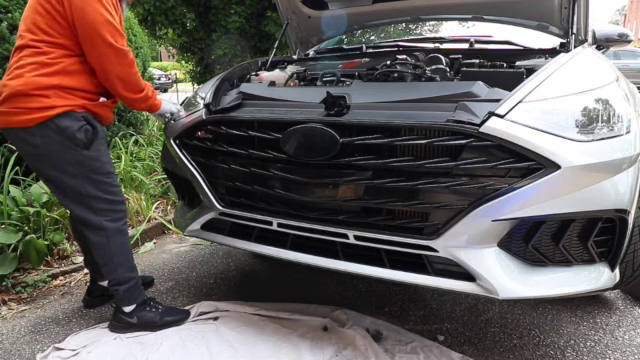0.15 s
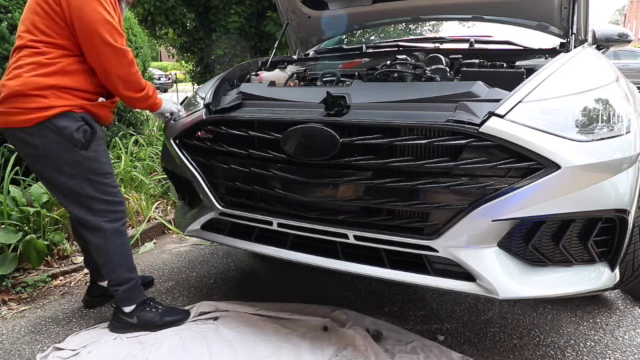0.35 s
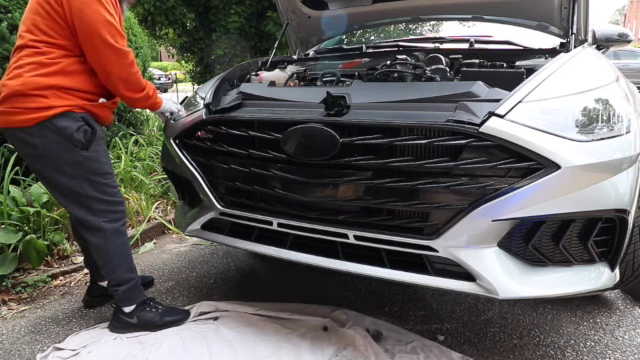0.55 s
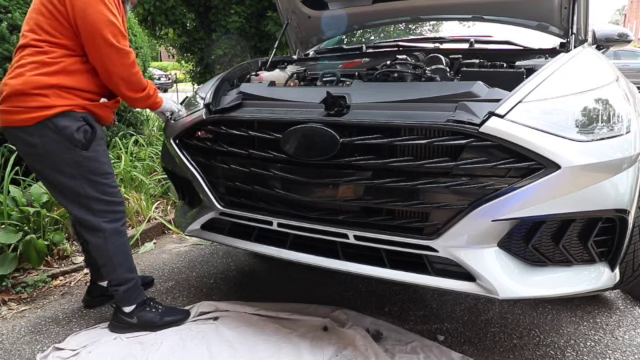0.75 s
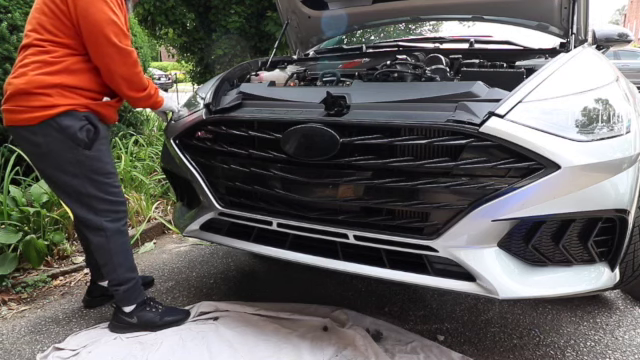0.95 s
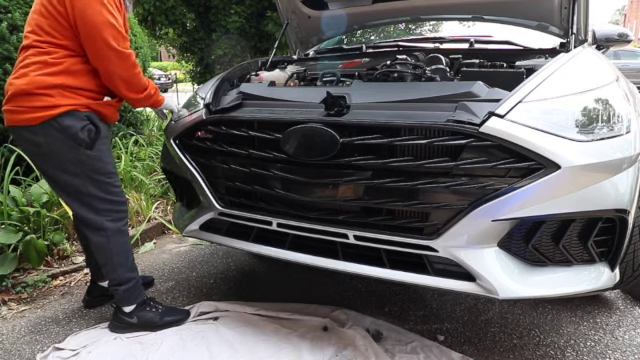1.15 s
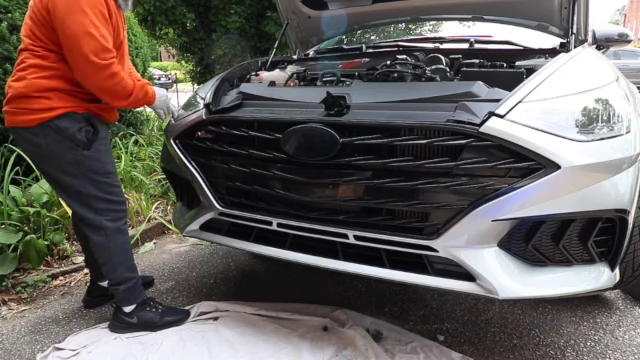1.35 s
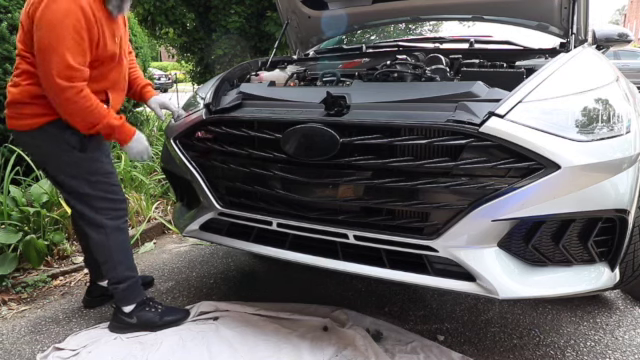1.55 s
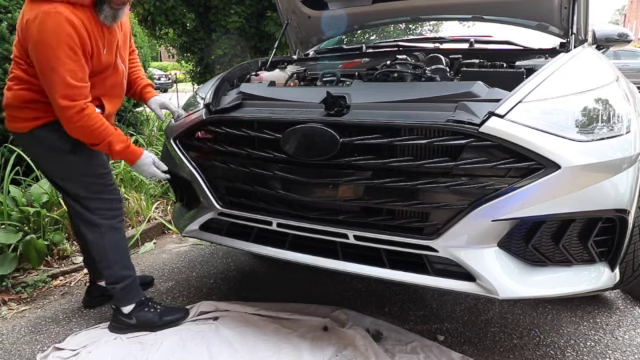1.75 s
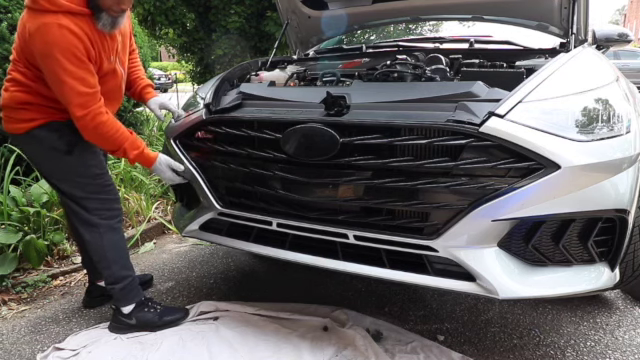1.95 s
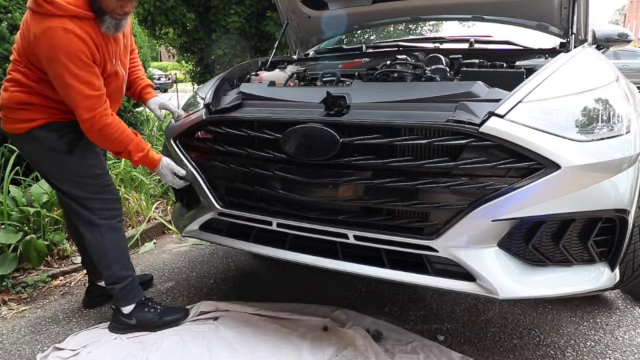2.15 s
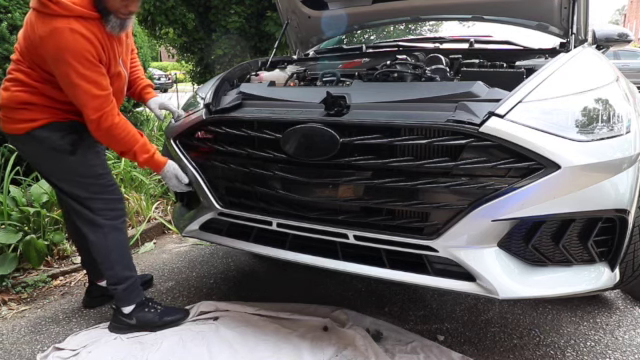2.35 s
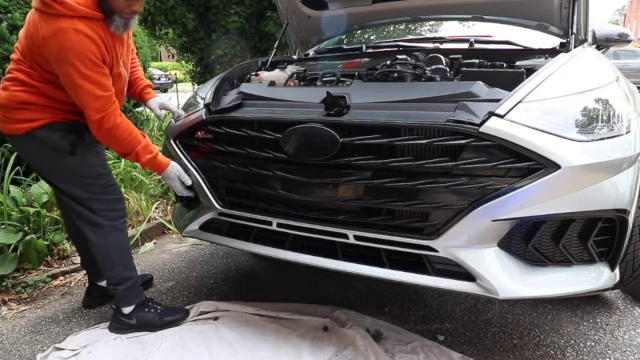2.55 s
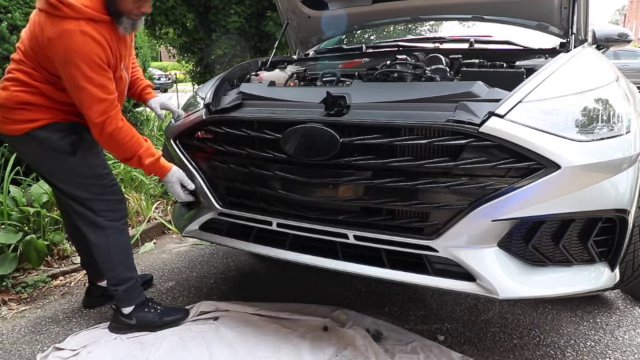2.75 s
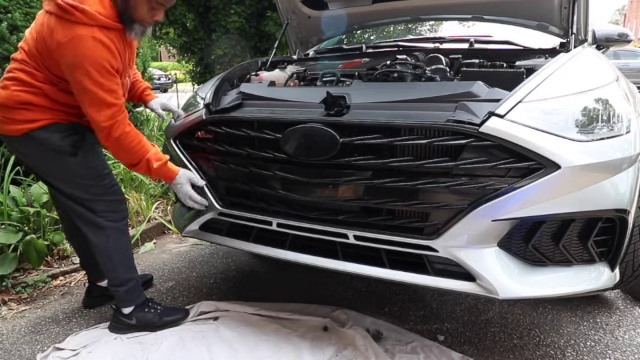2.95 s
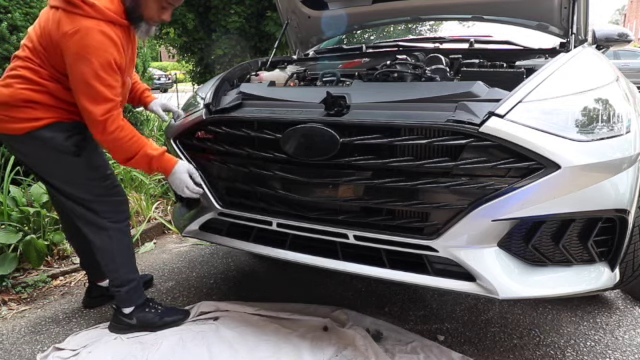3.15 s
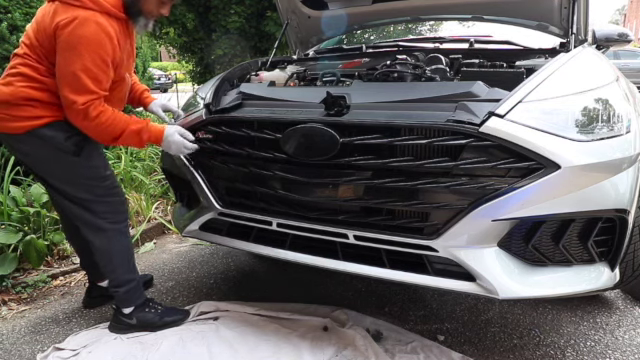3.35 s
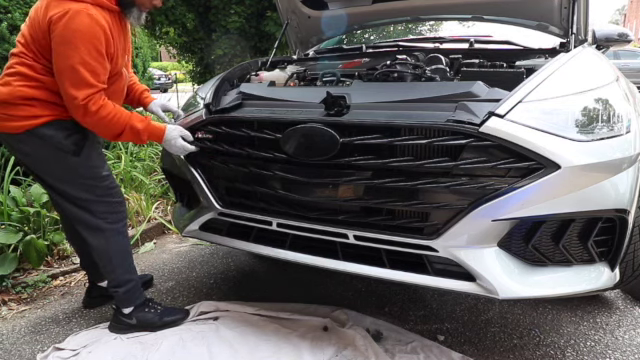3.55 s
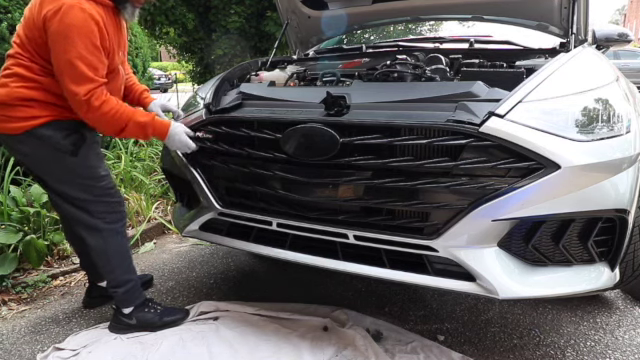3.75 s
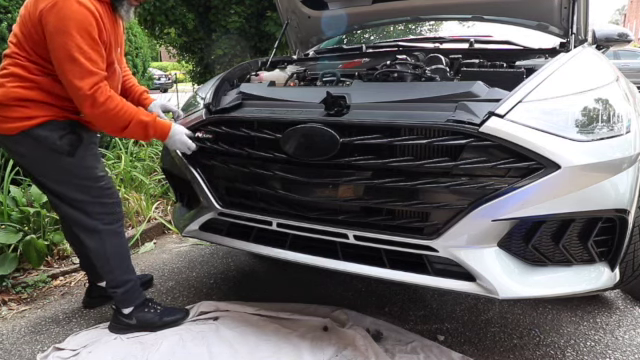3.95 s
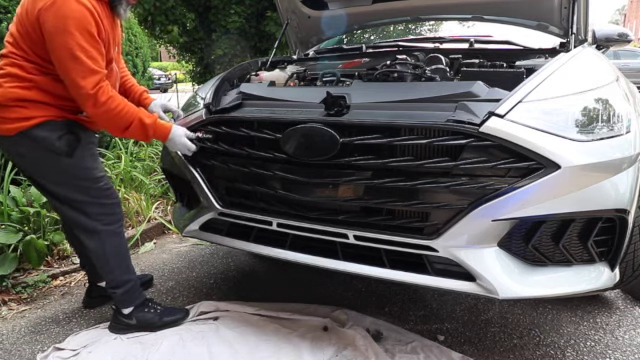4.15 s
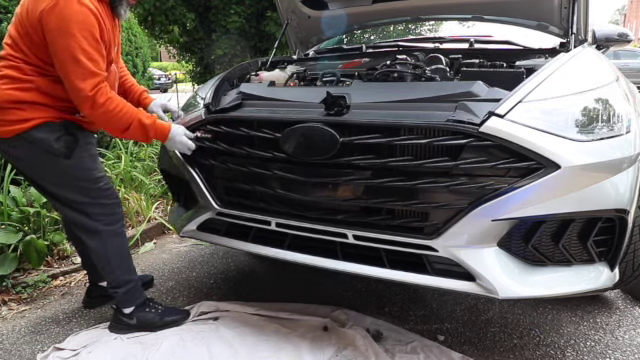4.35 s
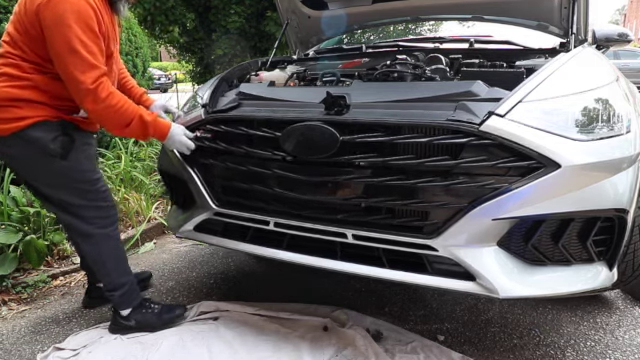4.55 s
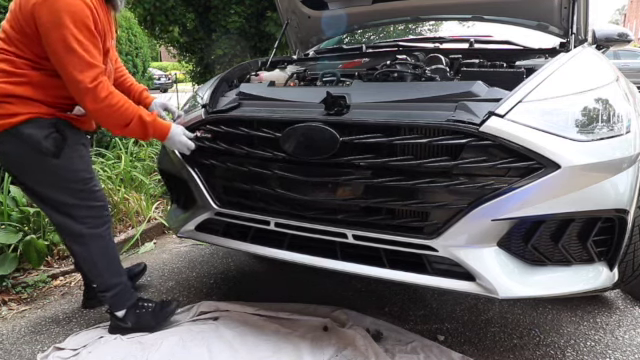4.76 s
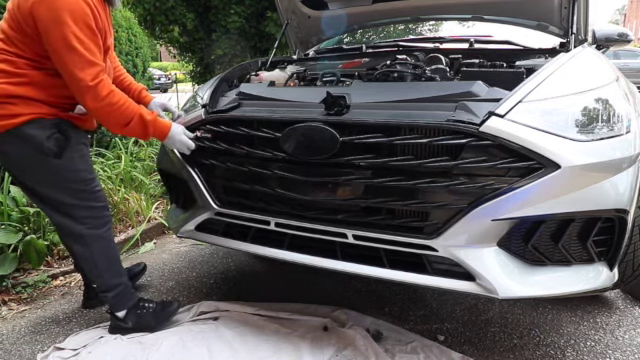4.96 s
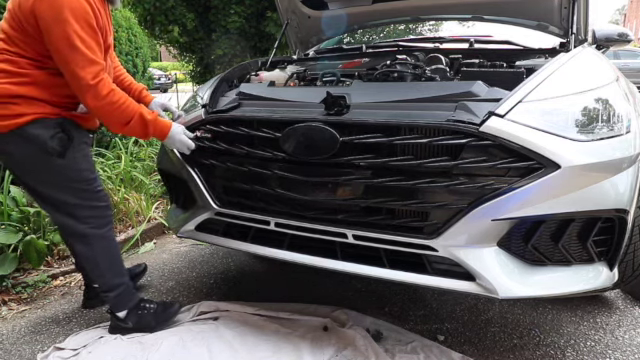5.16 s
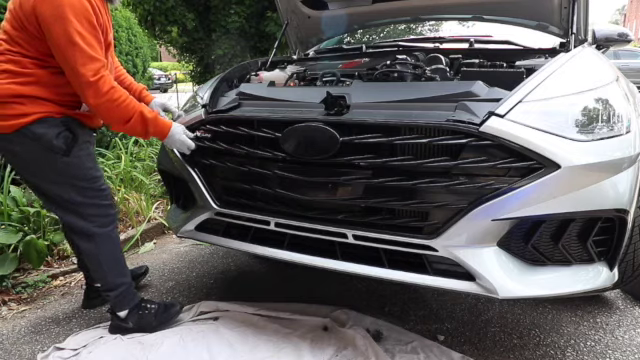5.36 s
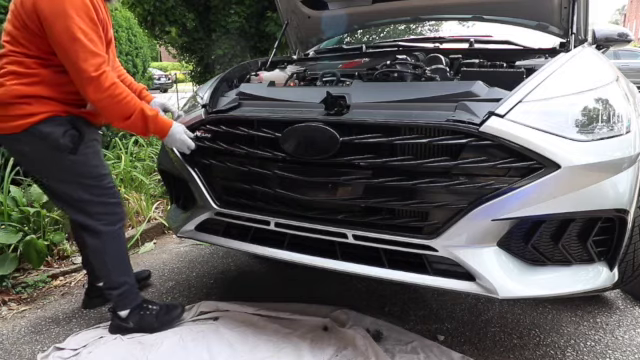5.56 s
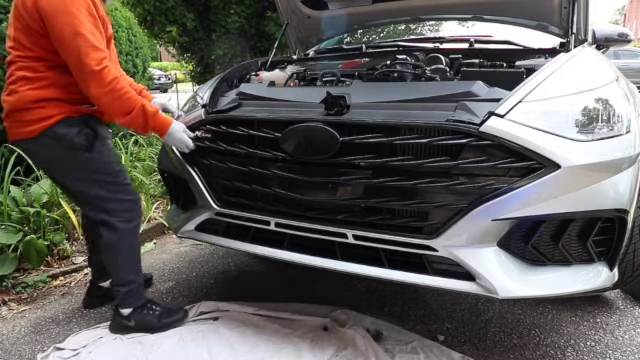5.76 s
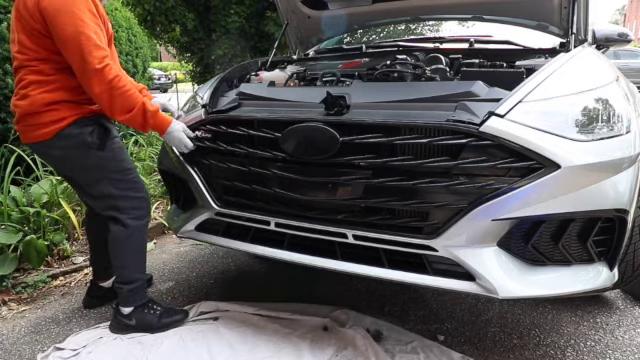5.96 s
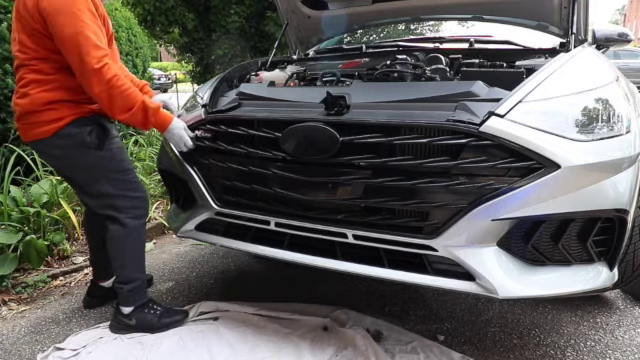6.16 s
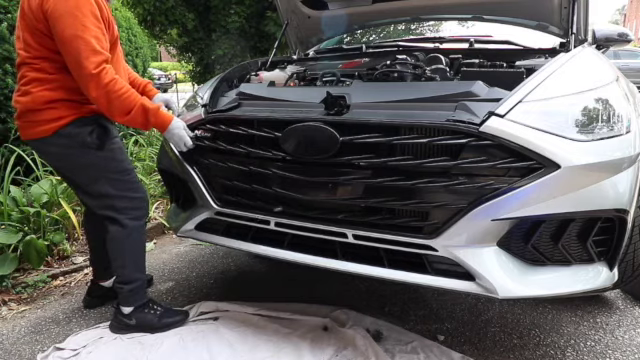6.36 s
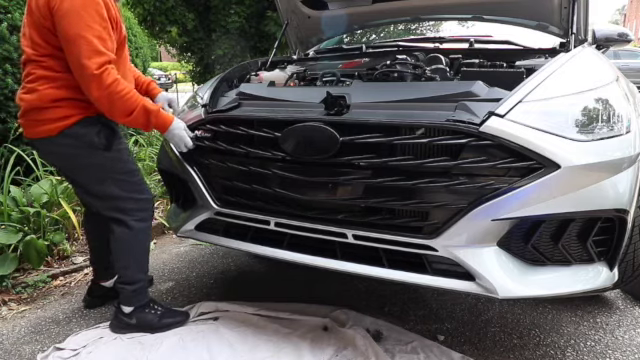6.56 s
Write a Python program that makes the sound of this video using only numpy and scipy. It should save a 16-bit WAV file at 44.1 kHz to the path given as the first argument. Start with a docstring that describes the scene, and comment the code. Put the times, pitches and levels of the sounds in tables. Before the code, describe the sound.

Very quiet beginning with dry creaky rubs, faint taps and a muffled thump over birdsong and distant road noise. A far engine hums briefly. Low flexing thuds accompany the pulling, then a brief ragged squeak and a crisp, bright double crack of clips letting go, with the loose cover knocking hollowly. It settles within half a second. Open air, slight reflections, fairly close microphone.

```python
"""At the open door of a garage, gloved hands pull a plastic bumper cover off a car.
Gripping and tapping give dry rubs (random slips) and light blows; tugs make the panel heave (low noise).
A tab squeaks by stick-slip, the clips snap free and the loose cover knocks: blows ring its modes.
Behind it are small birds (gliding sines), a high insect-like hiss and distant traffic (coloured noise)."""
import sys
import numpy as np
from scipy import signal
from scipy.fft import rfft, irfft, next_fast_len
from scipy.io import wavfile
from scipy.ndimage import uniform_filter1d

SR = 44100
rng = np.random.default_rng(int(sys.argv[2]) if len(sys.argv) > 2 else 0)


def inscribe(sig):
    """Save sig as 16-bit PCM at rate SR to the path in sys.argv[1].

    A 1-D sig is mono; a 2-D sig holds one channel per row.
    Samples are clipped to [-1, 1] before scaling.
    """
    pcm = np.round(np.clip(np.atleast_2d(sig).T, -1, 1) * 32767)
    wavfile.write(sys.argv[1], SR, pcm.astype(np.int16))


N = 291983
TIME = np.arange(N) / SR  # s
TOP_HZ = 15800  # upper limit of the audible band here


def undb(db):
    """Level to amplitude: 20 dB is a factor of ten."""
    return 10 ** (np.asarray(db) / 20)


def unit(x):
    """Normalisation to an rms value of 1."""
    return x / np.sqrt(np.mean(x ** 2))


def add(out, s, x):
    """Superposition: x is summed into out from time s on, cut at both ends of out."""
    i = int(s * SR)
    x = x[max(-i, 0):]
    i = max(i, 0)
    out[i:i + len(x)] += x[:max(N - i, 0)]


def colour(x, points):
    """Spectral weighting by (f/Hz, level/dB) points, interpolated along log frequency."""
    hz, db = np.transpose(points)
    size = next_fast_len(len(x))
    f = np.maximum(np.fft.rfftfreq(size, 1 / SR), 1)
    gain = undb(np.interp(np.log(f), np.log(hz), db))
    return irfft(rfft(x, size) * gain, size)[:len(x)]


def butter(x, hz, kind, order=2):
    """Causal Butterworth low-, high- or band-pass: a maximally flat passband."""
    edges = np.clip(hz, 5, .47 * SR)
    return signal.sosfilt(signal.butter(order, edges, kind, fs=SR, output="sos"), x)


def resonate(x, hz, width):
    """A single damped resonance of the given bandwidth in Hz, gain 1 at its centre."""
    return signal.lfilter(*signal.iirpeak(hz, hz / width, fs=SR), x)


def walk(rate):
    """Smoothed random fluctuation of rms 1: a fresh value rate times a second."""
    k = max(int(SR / rate), 1)
    steps = np.repeat(rng.standard_normal(N // k + 1), k)
    return unit(uniform_filter1d(steps, k)[:N])


def swell(s, hold, attack, release):
    """Exponential growth up to time s, a hold, exponential decay; attack and release are time constants."""
    growth = np.minimum(TIME - s, 0) / attack
    decay = np.maximum(TIME - s - hold, 0) / release
    return np.exp(growth - decay)


def echo(x, t60, wet_db):
    """Diffuse reverberation from walls and ground: exponentially decaying noise, 60 dB down after t60."""
    t = TIME[:SR // 2]
    tail = rng.standard_normal(len(t)) * undb(-60 * t / t60)
    tail /= np.linalg.norm(tail)
    return x + undb(wet_db) * signal.fftconvolve(x, tail)[:N]


def traffic(air_db=-69.1):
    """Broadband noise of distant traffic and leaves; passing cars swell a resonant tyre band."""
    # spectral density of distant traffic and leaves: f/Hz, level/dB per Hz
    outdoor_spectrum = [(20, -5), (60, 1.5), (190, -0.5), (330, -5), (620, -8), (960, -1.5), (1300, -10),
                        (2000, -14), (3100, -18), (4800, -22), (6000, -21.5), (7200, -30), (10000, -31.5),
                        (15000, -33)]
    # far cars going by: nearest at t/s, half-length/s, tyre level/dB
    passes = [(.8, .5, -77), (3.6, .6, -77), (5.95, .24, -73.5)]
    air = unit(colour(rng.standard_normal(N), outdoor_spectrum)) * undb(air_db + .5 * walk(3.3))
    power = sum(undb(db) ** 2 * np.exp(-((TIME - s) / length) ** 2 / 2) for s, length, db in passes)
    tyre_band = resonate(resonate(rng.standard_normal(N), 980, 180), 980, 180)
    return air + unit(tyre_band) * np.sqrt(power)


def shrill_hiss(shrill_db=-84.5):
    """Narrow-band noise: a band-pass gives a high insect-like hiss with slight level fluctuation."""
    band = butter(rng.standard_normal(N), [5500, 6150], "bandpass", order=3)
    return unit(band) * undb(shrill_db + .8 * walk(12))


def engine(engine_db=-73.5, octave_db=-10):
    """Two harmonics, frequency-modulated: a far engine speeds up, then slowly sags."""
    start_s, hold_s, fade_s = 2.25, .95, .18
    top_s, top_hz = 2.5, 164  # moment and frequency of the highest pitch
    rise_hz_per_s, sag_hz_per_s = 22, 10
    hz = top_hz - np.maximum(rise_hz_per_s * (top_s - TIME), sag_hz_per_s * (TIME - top_s))
    phase = 2 * np.pi * np.cumsum(hz * (1 + .008 * walk(22))) / SR
    load = swell(start_s, hold_s, fade_s, fade_s)
    harmonics = np.sin(phase) + undb(octave_db) * np.sin(2 * phase)
    return unit(harmonics * 1.0) * load * undb(engine_db + 1.5 * walk(9.8))


def birds(waver=0.012):
    """Frequency glides: three motifs of warbling sine notes recur, blurred by trees and walls."""
    # motifs, note by note: start t/s, length/s, from f/Hz, to f/Hz, level/dB, warble share
    bird_motifs = {"fall": [(-.01, .06, 4480, 3750, -3, .03), (.03, .055, 3700, 3300, -.5, .02),
                   (.07, .07, 3150, 2680, 1, .02)], "whistle": [(-.008, .06, 5100, 4820, -1.5, .04),
                   (.06, .06, 3550, 4300, -3, .08)], "chatter": [(0, .04, 4867, 4500, -1.5, .13),
                   (.03, .05, 3900, 3500, -.5, .08), (.075, .05, 4400, 3400, -3.5, .1),
                   (.13, .05, 3400, 4200, -3, .09), (.18, .036, 4300, 3600, -5, .08)]}
    # calls: t/s, motif, level/dB
    calls = [(.345, "fall", -75), (.99, "chatter", -70), (1.232, "fall", -72.5), (2.021, "whistle", -72),
             (2.36, "fall", -73), (2.53, "chatter", -72), (3.01, "whistle", -72), (3.23, "fall", -73),
             (3.75, "chatter", -70), (4.195, "whistle", -75), (4.945, "fall", -75), (5.15, "whistle", -75),
             (5.505, "chatter", -69), (5.61, "fall", -74), (6.012, "whistle", -73), (6.275, "chatter", -71),
             (6.495, "fall", -74)]
    out, tremble = np.zeros(N), walk(900)
    for s, motif, db in calls:
        for start, length, from_hz, to_hz, note_db, warble in bird_motifs[motif]:
            u = np.linspace(0, 1, int(length * SR))
            i = rng.integers(N // 2)
            glide = from_hz + (to_hz - from_hz) * u
            hz = glide * (1 + waver * rng.standard_normal() + warble * tremble[i:i + len(u)])
            note = np.sin(np.pi * u) ** 2 * np.sin(2 * np.pi * np.cumsum(hz) / SR)
            add(out, s + start, undb(db + note_db) * note)
    return echo(out, t60=.3, wet_db=2)


def flex():
    """Low-frequency radiation of a large panel: the cover heaves as it is tugged."""
    # spectral density of the heaving panel: f/Hz, level/dB per Hz
    heave_spectrum = [(10, -15), (22, -0.5), (35, 2), (60, -9), (100, -15.5), (180, -30.5), (400, -61),
                      (3000, -110)]
    # tugs: t/s, hold/s, level/dB
    tugs = [(3.15, .075, -48.5), (3.33, .02, -62), (3.725, .035, -56), (3.93, .025, -54),
            (4.265, .08, -59.5), (5.04, .04, -69.5), (6.56, .05, -64)]
    attack_s, release_s = .026, .03
    effort = sum(undb(db) * swell(s, hold, attack_s, release_s) for s, hold, db in tugs)
    return unit(colour(rng.standard_normal(N), heave_spectrum)) * effort


def rubs(slips_per_s=1000, scatter_db=4, edge_s=.006):
    """Dry friction as random tiny slips: a hiss from the glove, a creak where they ring a plastic edge."""
    # rubs: t/s, length/s, level/dB, share of creak in the power (0-1)
    rub_events = [(0.103, 0.03, -74, 0.4), (0.404, 0.022, -70.5, 0.75), (0.495, 0.025, -71, 0.6),
                  (0.64, 0.012, -67, 0.9), (0.705, 0.051, -61, 0.95), (0.784, 0.041, -71, .8),
                  (1.338, 0.023, -74, .2), (2.218, .03, -77, 0), (2.942, 0.096, -75.5, 0),
                  (3.38, 0.052, -74.5, 0.47), (3.434, .06, -73.5, 0.3), (3.78, 0.13, -77, .2),
                  (4.087, 0.047, -68, 0), (4.308, 0.055, -67, 0.4)]
    # resonances of a creaking plastic edge: f/Hz, bandwidth/Hz, level/dB
    edge_resonances = [(1790, 110, -4), (2005, 110, 4), (2870, 560, -6.5), (3350, 140, -3.5),
                       (3640, 130, -1), (4507, 73, -10), (5500, 300, -11)]
    # spectral density of the glove's hiss: f/Hz, level/dB per Hz
    glove_spectrum = [(900, -13), (2500, 0), (5500, 1.5), (8000, -8), (11000, -9.5), (15000, -8.5)]
    occurs = rng.random(N) < slips_per_s / SR
    slips = occurs * undb(scatter_db * rng.standard_normal(N)) * rng.choice([-1, 1], N)
    creak = unit(sum(undb(db) * resonate(slips, hz, width) for hz, width, db in edge_resonances))
    hiss = unit(colour(unit(slips) + rng.standard_normal(N), glove_spectrum))
    out = np.zeros(N)
    for s, length, db, share in rub_events:
        share = np.clip(share, 0, 1)
        grip = np.clip(np.minimum(TIME - s, s + length + edge_s - TIME) / edge_s, 0, 1)
        out += undb(db) * grip * (np.sqrt(share) * creak + np.sqrt(1 - share) * hiss)
    return echo(out, t60=.16, wet_db=-8)


def squeak(jitter=0.2, grit_db=-1, wobble=.04, patchy_db=2.5, count=9):
    """Stick-slip of the tab in its slot: slower and more ragged as the load builds before the snap."""
    # spectral weighting by the tab: f/Hz, level/dB
    tab_spectrum = [(400, -7), (850, -0.5), (1400, -8.5), (2000, -2), (2500, 2), (3200, -2), (4400, -1.5),
                    (5500, -13.5), (8000, -20), (14000, -25.5)]
    start_s, hold_s, level_db = .0 + 4.294, .042, -55  # full level from start_s
    attack_s, release_s = .012, .016
    slip_hz, fastest_hz = 1240, 2500  # mean rate at start_s, upper bound of the mean rate
    slowing = .0128  # share of a second by which the slip period grows per second
    smooth_roughness, ragged_after_s = .2, .048  # roughness (0-1) at first, time scale of its growth
    age = TIME - start_s
    hz = 1 / np.maximum(1 / slip_hz + slowing * age, 1 / fastest_hz)
    rough = np.minimum(smooth_roughness + (np.maximum(age, 0) / ragged_after_s) ** 2, 1)
    unsteady_hz = hz * (1 + wobble * walk(130) + jitter * rough * walk(1200))
    phase = 2 * np.pi * np.cumsum(unsteady_hz) / SR
    # harmonics of the slip rate, kept below the upper limit
    slips = sum(np.cos(k * phase) * (k * hz < TOP_HZ) / np.sqrt(k) for k in range(1, count + 1))
    # noise that peaks once a slip
    grit = undb(grit_db) * rough * (1 + np.cos(phase)) * rng.standard_normal(N)
    pressure = undb(level_db + patchy_db * walk(170)) * swell(start_s, hold_s, attack_s, release_s)
    return echo(unit(colour(slips + grit, tab_spectrum)) * pressure, t60=.15, wet_db=-10)


def blow(pitch, contact, modes_db, tail_db, spot_hz, spot_db, crack_t60=.035, spot_t60=0.064,
         rise_s=0.00022, spread_s=.002, crack_db=-1.0, ring_db=-3.5):
    """Impact excitation: a crack held for the contact, a thud of the struck spot, modes and a dense tail."""
    # modes of the clipped-on cover, before the pitch factor: f/Hz, relative level/dB, t60/s
    cover_modes = [(122, -22, .45), (205, -13, .28), (292, -15, .24), (361, -15, .2), (447, -14, .22),
                   (534, 1, .115), (695, -4, .1), (812, -12, .2), (845, 0, .09), (876, -4, .15),
                   (945, -1, .06), (1035, -3, .11), (1291, -9, .11), (1384, -15, .2), (1671, -2, .09),
                   (1736, -15, .16), (1998, -7, .09), (2266, -21, .2), (2392, -8, .1), (3000, -14, .1),
                   (3700, -11, .12), (4081, -14, .1), (4560, -10.5, .11), (4909, -10.5, .1),
                   (5510, -13, .1), (5765, -10, .1)]
    # spectral density of the crack: f/Hz, level/dB per Hz
    crack_spectrum = [(50, -15), (130, -8), (250, 0), (900, 2), (1250, -3), (1800, -2), (2600, -7),
                      (4000, -8), (5600, -5), (7500, -16), (10500, -18.5), (14000, -13.5), (16500, -22.5)]
    # the crowd of small modes, by octave band: centre f/Hz, relative level/dB, t60/s
    tail_bands = [(80, -23, .6), (197, -23, 0.47), (435, -19, 0.4), (955, -14, .29), (2000, -22.5, 0.33),
                  (3470, -17.5, 0.26), (5370, -21, 0.17), (7800, -30.5, .22), (13000, -32, .19)]
    t = TIME[:SR * 3 // 4]
    after = np.maximum(t - contact, 0)
    crack = unit(colour(rng.standard_normal(len(t)), crack_spectrum))
    crack = crack * (1 - np.exp(-t / rise_s)) * undb(-60 * after / crack_t60)
    thud = undb(spot_db - 60 * t / spot_t60) * np.sin(2 * np.pi * spot_hz * t)
    ring = sum(undb(db - 60 * t / t60) * np.sin(2 * np.pi * (hz * pitch * t + rng.random()))
               for hz, db, t60 in cover_modes)
    tail = 0
    for hz, db, t60 in tail_bands:
        band = butter(rng.standard_normal(len(t)), [hz / np.sqrt(2), hz * np.sqrt(2)], "bandpass")
        tail = tail + unit(band) * undb(db - 60 * t / t60)
    # bending waves take a moment to fill the panel
    filled = 1 - np.exp(-t / spread_s)
    return undb(crack_db) * crack + thud + filled * (undb(ring_db + modes_db) * ring + undb(tail_db) * tail)


def cover():
    """Modal radiation of snaps and knocks: a small tab lacks bass, a soft contact lacks treble."""
    # blows: t/s, level/dB, struck spot's f/Hz, its thud level/dB, upper edge f/Hz, contact/s, ring level/dB
    blows = [(.9405, -60, 900, -6, 6000, .001, 1), (1.074, -65, 800, -5, 1200, .004, 6),
             (2.0112, -44, 420, -2, 420, .0028, -7), (2.041, -55, 170, 1, 380, .0026, -11),
             (2.540, -57, 480, -7, 750, .005, -6), (3.693, -45, 980, -1, 3900, .0012, -6),
             (4.4108, -28.5, 3700, -19, 8140, .0017, -11), (4.4201, -17.3, 865, -4, 15030, .0056, 0),
             (4.4231, -18.3, 4520, -9, 9000, .0019, -15), (4.504, -44, 4900, -12, 11900, .002, 2),
             (4.5888, -29, 662, 2, 1470, .0016, -4), (4.597, -32, 290, 0, 3230, .0043, -3),
             (4.606, -34.5, 490, 5, 1900, .012, 4), (4.632, -49, 200, 14, 796, .004, 0),
             (4.6762, -35, 273, 1, 1900, .0043, 2), (4.6818, -34, 900, -7, 4840, .0038, 1.5),
             (4.712, -50, 926, 17, 1690, .0085, -2), (4.75, -51, 300, -5, 1790, .0034, 1),
             (4.832, -63, 700, -4, 4495, .0028, 1), (5.066, -63, 521, 5, 705, .0057, -2),
             (6.239, -61.5, 600, -2, 3534, .001, -7)]
    free_s, free_pitch = 4.55, .9  # off its clips the cover is slacker and its modes lie lower
    low_edge_share = .23  # a spot radiates little below this share of its pitch
    clear_modes_db = -1.0  # clear modes against the dense tail
    out = np.zeros(N)
    for s, db, spot_hz, thud_db, high_hz, contact, ring_db in blows:
        pitch = free_pitch if s > free_s else 1
        x = blow(pitch, contact, ring_db + clear_modes_db, ring_db, spot_hz, thud_db)
        x = butter(x, low_edge_share * spot_hz, "highpass")
        x = butter(x, high_hz, "lowpass", order=1)
        add(out, s, undb(db) * x)
    return out


def scene():
    """Superposition of all sources at one listening point in front of the car."""
    background = traffic() + shrill_hiss() + engine() + birds()
    return (background + flex() + rubs() + squeak() + cover())[None]


def record(dry):
    """Band limitation: a steep elliptic low-pass removes the treble above TOP_HZ."""
    return signal.sosfilt(signal.ellip(8, .2, 70, TOP_HZ, fs=SR, output="sos"), dry)


dry = scene()
out = record(dry)
inscribe(out)
```